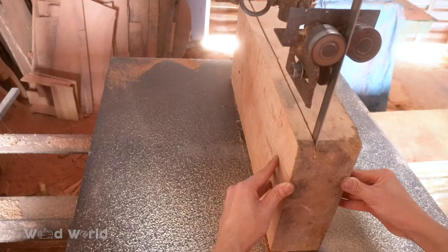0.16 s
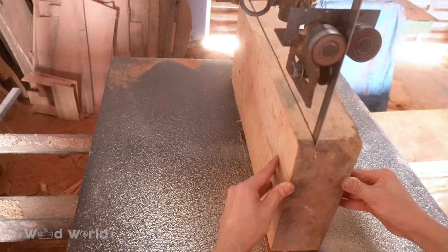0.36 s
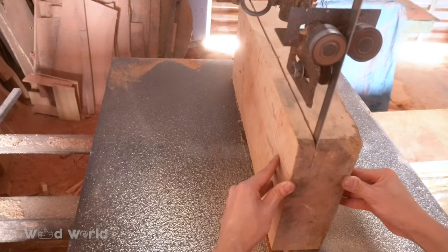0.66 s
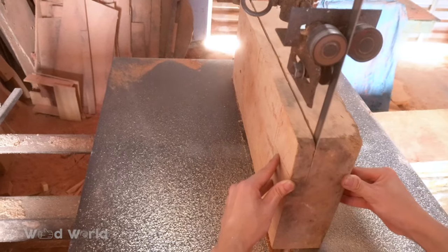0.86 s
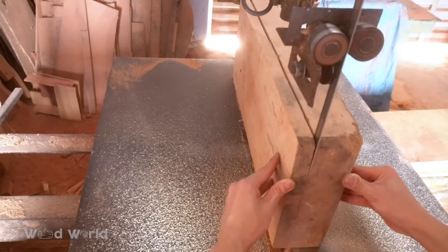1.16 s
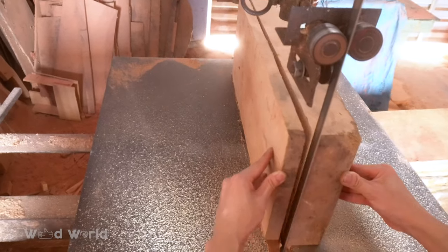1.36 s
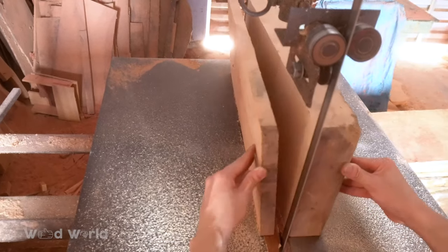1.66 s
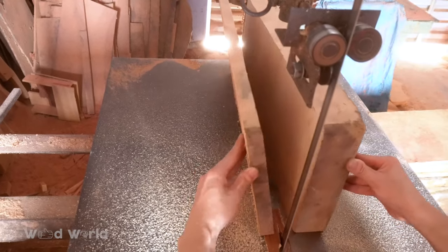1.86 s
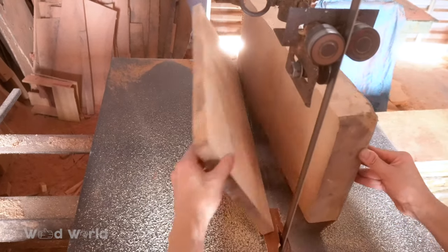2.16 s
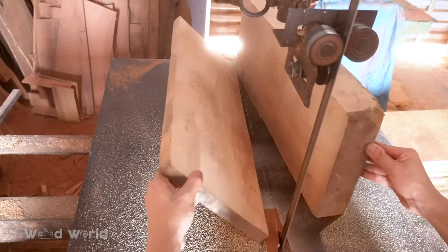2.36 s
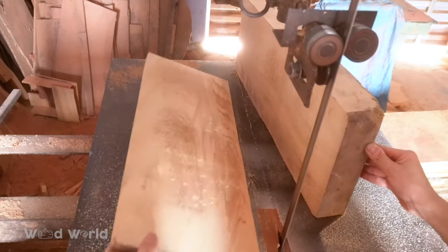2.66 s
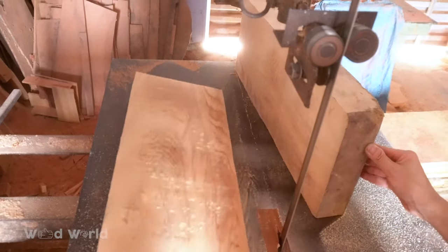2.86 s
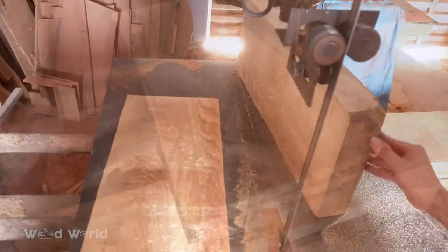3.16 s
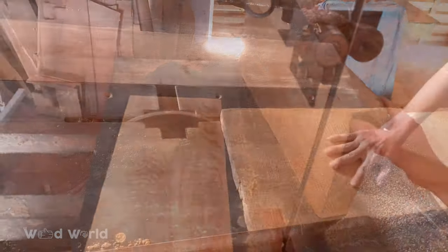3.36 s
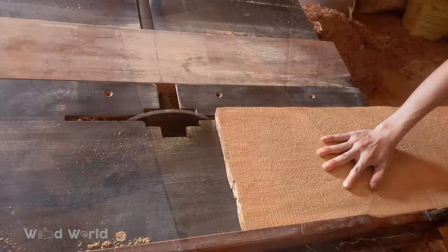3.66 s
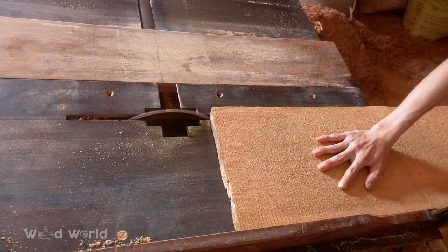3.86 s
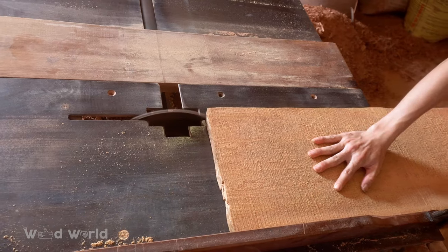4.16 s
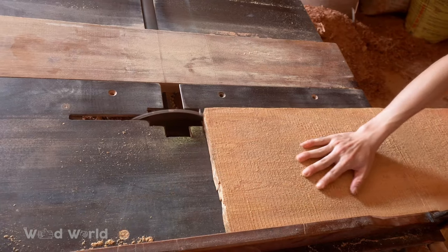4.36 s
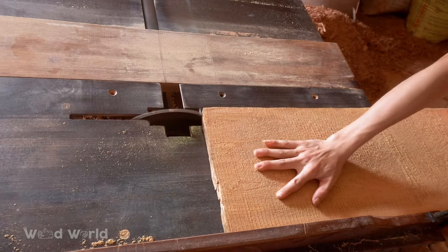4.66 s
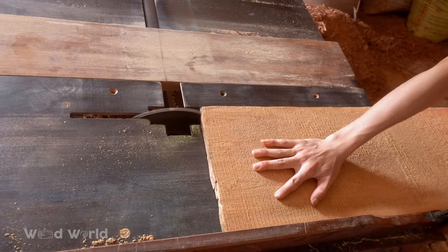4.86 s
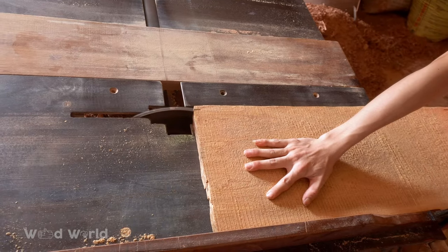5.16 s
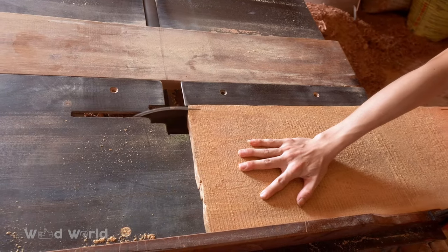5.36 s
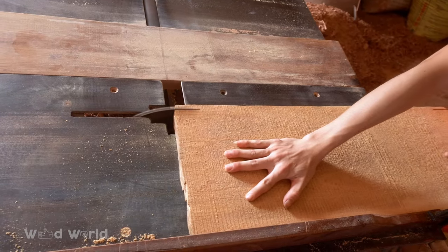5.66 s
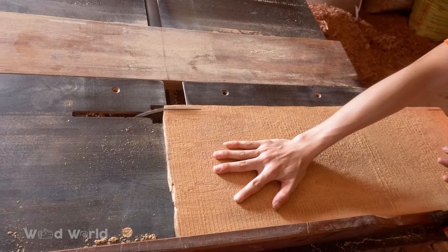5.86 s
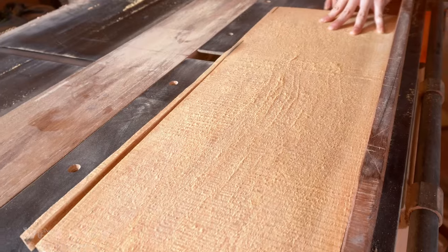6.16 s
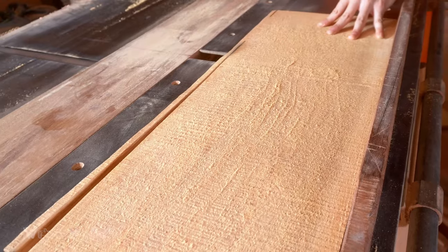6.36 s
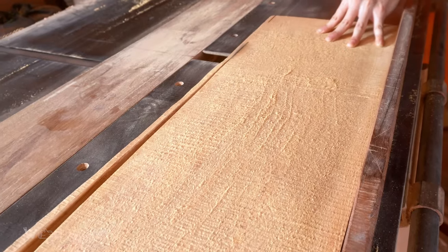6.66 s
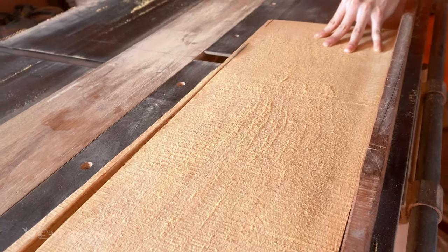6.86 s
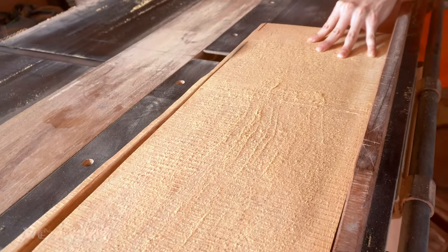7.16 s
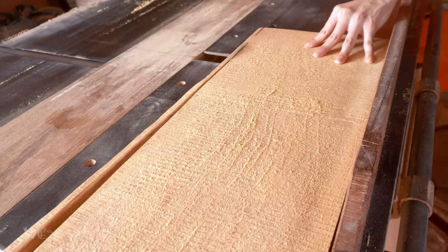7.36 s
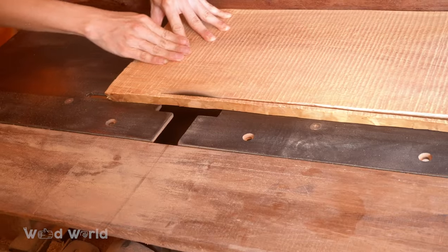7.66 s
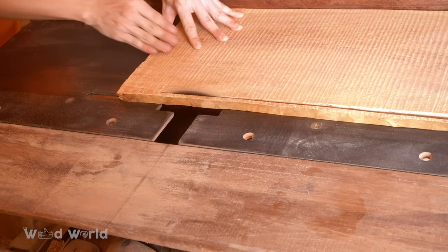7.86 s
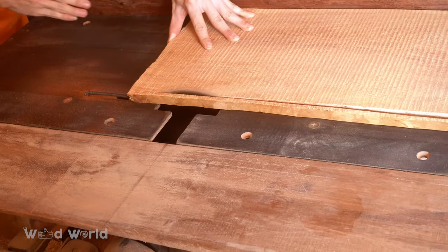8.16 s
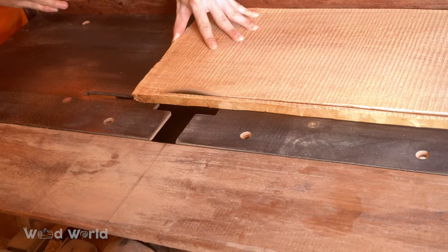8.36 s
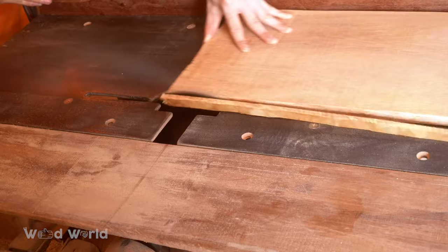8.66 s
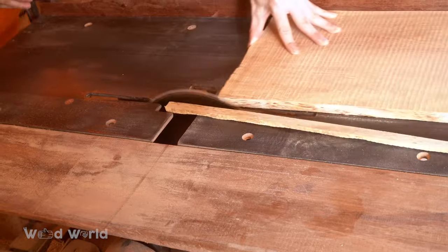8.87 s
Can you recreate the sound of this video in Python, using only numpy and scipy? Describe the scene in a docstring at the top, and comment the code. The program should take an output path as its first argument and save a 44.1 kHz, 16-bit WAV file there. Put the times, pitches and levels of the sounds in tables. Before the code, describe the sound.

A band saw is already cutting a thick wood block at 0 s, very close at first, with a dry rasp, thin whine and sawdust hiss. From 0.25 s more frame rattle is heard; small grabs pulse through the cut, the strongest near 1.37 s. By about 1.7 s the rasp opens into a lower metallic ringing and steady hiss. Around 2.9-3.2 s a plank scrapes and drops with a soft hollow knock. At 3.44 s it switches to a low, steady planer hum with rushing air. At 4.0 s a circular saw bites a board: gritty buzz, chip hiss, ringing disc, harder from 5.1 s, with whistles and squeals. At 6.13 s the view is nearer, rougher and shriller, with shrieks about 7 s. At 7.59 s it shifts again; the rip continues, flares around 8.75 s with a rising scrape, then falls away to hum by 9 s.

```python
"""A circular saw on a planer's shaft rips a board: each tooth tears out a noisy chip, and disc and board ring.
The planer's three knives hum on the same shaft; gain control ducks the hum as the saw bites.
This machine is heard from three places, one straight after the other.
Before it, a band saw rasps through the end of a thick block and runs on; the loose plank is laid on its table."""
import sys
import numpy as np
from scipy import signal
from scipy.fft import rfft, irfft, next_fast_len
from scipy.io import wavfile
from scipy.ndimage import map_coordinates

SR = 44100
rng = np.random.default_rng(int(sys.argv[2]) if len(sys.argv) > 2 else 0)


def wav_out(sig):
    """Save sig, one row per channel (or a flat mono array), as 16-bit PCM at SR to the path in sys.argv[1]."""
    wavfile.write(sys.argv[1], SR, np.round(np.clip(np.atleast_2d(sig).T, -1, 1) * 32767).astype(np.int16))


N = 396900


def undb(db):
    """Decibels to gain."""
    return 10 ** (np.asarray(db) / 20)


def curves(table, t):
    """The columns of a table, joined by straight lines and read at the times t."""
    s, *columns = np.transpose(table)
    return [np.interp(t, s, c) for c in columns]


def shaped(x, response):
    """Filter x with a response given as a function of frequency."""
    size = next_fast_len(len(x) + 4096)
    f = np.maximum(np.arange(size // 2 + 1) * SR / size, 1)
    return irfft(rfft(x, size) * response(f), size)[:len(x)]


def slope(f, points):
    """Gain along (Hz, dB) points, joined on a logarithmic pitch scale."""
    hz, db = np.transpose(points)
    return undb(np.interp(np.log(f), np.log(hz), db))


def colour(x, points):
    """Give x a spectrum; rms 1."""
    y = shaped(x, lambda f: slope(f, points))
    return y / y.std()


def ring(x, modes):
    """Resonances (Hz, width Hz, dB); white drive of rms 1 gives each its level."""
    def response(f):
        total = 0
        for k, (hz, width, db) in enumerate(modes):
            level = undb(db) * np.sqrt(SR / np.pi / width)
            # neighbours take opposite signs
            total = total + (-1) ** k * level / (1 + 1j * (f * f - hz * hz) / (f * width))
        return total
    return shaped(x, response)


def walk(t, rate, size=8):
    """Smooth chance with a spread near 1, taking a new random value `rate` times a second."""
    knots = rng.standard_normal(4096)
    steps = (t - t[0]) * rate
    grid = np.arange(int(steps[-1] * size) + 2) / size
    return np.interp(steps, grid, map_coordinates(knots, [grid], order=2, mode="wrap"))


def bump(t, s, half):
    """A smooth rise and fall around the time s."""
    return np.exp(-((t - s) / half) ** 2)


def swell(t, cycle):
    """A regular swell of a turning part."""
    rate, crest = cycle
    return np.cos(2 * np.pi * rate * (t - crest))


def strikes(phase, scatter_db, decay):
    """Each tooth or knife pass makes a burst of noise with its own strength; decay in passes; rms 1."""
    sizes = undb(scatter_db * rng.standard_normal(2 ** 15))
    strength = sizes[phase.astype(int) % len(sizes)]
    y = strength * np.exp(-(phase % 1) / decay) * rng.standard_normal(len(phase))
    return y / y.std()


# The plank scrapes and lands. Each row: time in seconds, level in dB, pitch in Hz, width in Hz,
# rise in seconds, decay in seconds.
PLANK_CONTACTS = [(2.93, -26.5, 2220, 70, 0.0044, 0.052), (2.97, -27, 1550, 600, 0.025, 0.024),
                  (3.14, -28, 970, 120, 0.091, 0.053), (3.198, -21, 1030, 264, .004, 0.027),
                  (3.225, -25, 808, 55, 0.017, 0.06)]


def plank(t):
    """The plank's edge scrapes over the iron table and it drops flat with a hollow knock."""
    out = 0
    for s, db, hz, width, rise, decay in PLANK_CONTACTS:
        contact = np.exp(np.minimum((t - s) / rise, (s - t) / decay))
        rub = shaped(rng.standard_normal(len(t)), lambda f: np.exp(-((f - hz) / width) ** 2))
        out = out + undb(db) * contact * rub / rub.std()
    return out


# How much of the band is in the wood.
# Each row: time in seconds, share of its sound that comes from teeth in the wood, 0 to 1.
BITE = [(0, 1), (1.25, .97), (1.56, .72), (1.72, .12), (2.1, 0)]
# Band saw, eased off as the cut nears its end.
# Each row: time in seconds, blade rasp in dB, sawdust hiss in dB.
FEED = [(0, -24.5, -23), (0.45, -24.5, -31.5), (0.9, -24, -33), (1.17, -23.5, -30.5), (1.28, -28, -35.5),
        (1.66, -27, -34.5), (1.75, -28, -30.5), (3.43, -30, -30.3)]
# The band grabs and shakes; the strongest grab is the teeth breaking through.
# Each row: time in seconds, half length in seconds, change of the rasp in dB, of the frame in dB.
GRABS = [(0.045, 0.02, 1, 3), (0.32, 0.068, 1.8, -2), (0.44, .05, -0.5, 1.5), (0.58, 0.031, -1, 2.5),
         (0.68, 0.051, 2.5, -5), (0.884, 0.06, 0, -2.5), (1.013, 0.034, 0.5, -7), (1.3, 0.051, 0, -5),
         (1.368, 0.027, 6, -0.5), (1.99, 0.02, 0, 2.5), (2.396, 0.017, 1.5, 5)]
# Noise colours of the band in the cut, the band running free, its frame, and the dust.
# Each row: pitch in Hz, relative level in dB.
KERF_COLOUR = [(200, -60), (900, -20), (1350, -13.5), (1900, -3.5), (2400, -4), (3000, -2.5), (3800, -3.5),
               (4600, -7), (5200, -12), (7000, -14.5)]
FREE_COLOUR = [(200, -65), (900, -30), (1400, -13), (1700, -5.5), (1900, 6), (2300, 0), (2650, 1.5),
               (3300, -3), (3900, 3), (4550, -14), (5200, -25)]
FRAME_COLOUR = [(60, -68), (120, -32), (170, -32), (230, -22), (340, -6), (430, -2), (540, 3), (800, 2),
                (1000, 4.5), (1250, -2.5), (1600, 3), (2500, -41)]
DUST_COLOUR = [(300, -65), (2500, -19), (4800, 2.5), (7500, 1.5), (9800, 1.5), (12000, -1), (15000, -0.5),
               (16000, -0.5)]
# Resonances of the band pinched in the cut, heard close by, and free between its guides; then of the frame.
# Each row: pitch in Hz, width in Hz, relative level in dB.
PINCHED_MODES = [(2690, 55, -13), (3160, 34, -5.5), (3500, 90, -19), (3780, 70, -16), (4650, 120, -20),
                 (9850, 70, -22)]
CLOSE_UP_MODES = [(3450, 40, -7), (4640, 70, -11)]
FREE_MODES = [(1560, 30, -19), (1880, 90, -11), (2210, 60, -7), (2960, 55, -9.5), (4060, 120, -12),
              (4440, 80, -12.5)]
FRAME_MODES = [(350, 7.9, -24.5), (505, 11, -17), (660, 6.8, -36), (1000, 5.8, -7.5), (1247, 59, -8)]
# the band swells once a lap and once a turn of its wheels: (swells per second, time of a crest in s)
LAP, WHEEL = (2.64, .335), (8.0, .105)
LAP_DB, WHEEL_DB = 0.3, 1  # swell depths, before the weights for blade and frame
FRAME_DB, FRAME_SWELL, FRAME_LAG_S = -35.5, 1.25, 0.06  # level, weight of the swells, lag behind the lap
# at first the blade is heard from close by, with little of the frame
CLOSE_UP_END_S, CLOSE_UP_FRAME_DB = 0.25, -10
WHINE_SWELL, WHINE_FLICKER_DB = .6, 1.5  # the pinched whine follows each surge and breaks up
DIP_S, DIP_HALF_S, DIP_DB = 3.215, 0.026, -7  # the hiss dips as the plank lands, the blade less so
DUST_TILT_DB = 2  # the hiss above about 12 kHz gains half this in the cut, 2.5 times this running free


def band_saw(t, tooth_hz=460):
    """Teeth rasp through the block; once the cut opens, the free band rings lower between its guides."""
    rasp_db, dust_db = curves(FEED, t)
    bite = np.clip(curves(BITE, t)[0], 0, 1)
    close_up = np.clip((CLOSE_UP_END_S - t) / .08 + .5, 0, 1)

    # the band swells more while it is in the wood
    wheel_db = WHEEL_DB * swell(t, WHEEL)
    surge_db = (0.49 + 0.31 * bite) * (LAP_DB * swell(t, LAP) + wheel_db)
    surge_db = surge_db + sum(db * bump(t, s, half) for s, half, db, _ in GRABS)
    frame_db = FRAME_DB + CLOSE_UP_FRAME_DB * close_up + 0.73 * walk(t, 12)
    frame_db = frame_db + FRAME_SWELL * (LAP_DB * swell(t - FRAME_LAG_S, LAP) + wheel_db)
    frame_db = frame_db + sum(db * bump(t, s, half) for s, half, _, db in GRABS)
    dip_db = DIP_DB * bump(t, DIP_S, DIP_HALF_S)
    dust_db = dust_db + 0.81 * surge_db + dip_db

    teeth = np.cumsum(tooth_hz * (1 + .03 * walk(t, 6))) / SR  # teeth passed so far
    cutting = strikes(teeth, scatter_db=0.5, decay=1.7) * undb(2.15 * walk(t, 44.97))
    running = strikes(teeth, scatter_db=1.3, decay=2.1) * undb(1.7 * walk(t, 39.96))
    rubbing = rng.standard_normal(len(t))  # the band's flanks against wood and guides
    whine_db = WHINE_SWELL * surge_db + WHINE_FLICKER_DB * walk(t, 16.7) - 7 * close_up - 2.0
    kerf = undb(-1.0) * colour(cutting, KERF_COLOUR) + ring(rubbing * undb(whine_db), PINCHED_MODES)
    kerf += close_up * ring(rubbing, CLOSE_UP_MODES)
    free = undb(-1.5) * colour(running, FREE_COLOUR) + ring(rubbing, FREE_MODES)
    blade = np.sqrt(bite) * kerf + np.sqrt(1 - bite) * free

    shaking = strikes(teeth, scatter_db=2.0, decay=1.4)
    frame = colour(shaking, FRAME_COLOUR) + ring(shaking, FRAME_MODES)

    dust = colour(strikes(teeth, scatter_db=1.05, decay=5.3), DUST_COLOUR) * undb(.5 * walk(t, 28.73))
    top = shaped(dust, lambda f: 1 / (1 + (12000 / f) ** 8))
    dust = dust + top * (undb(DUST_TILT_DB * (2.5 - 2 * bite)) - 1)

    blade = blade * undb(rasp_db + surge_db + 0.31 * dip_db)
    return blade + frame * undb(frame_db) + dust * undb(dust_db)


# The cut loads the motor a little. Each row: time in seconds, shaft turns per second.
SHAFT = [(3.44, 83.28), (4.8, 83.22), (5.5, 83.1), (6.0, 82.98), (7.6, 83.0), (8.2, 83.17), (8.62, 83.27),
         (8.75, 82.85), (9, 83.35)]
# The machine at each place. Each row: hum in dB, air rush in dB, board chatter in dB over the cutting load,
# level of the whole place in dB, set after the gain control.
STATIONS = [(-18, -21.5, -5.5, 1), (-25.5, -24, -6.5, -0.33), (-19.5, -25, -8.5, -1)]
# Tones of the hum. Each row: multiple of the knife rate, relative level in dB at each of the three places.
HUM = [(1, -17, -12.5, -28.5), (2, 0.5, -4, 2), (3, -13.5, -5.5, -22.5), (4, -18, -17, -6.5),
       (5, -34, -11, -16), (7, -22.5, -3.5, -14)]
# Air thrown by the cutter block. Each row: pitch in Hz, relative level in dB.
AIR_COLOUR = [(40, -66), (130, -32.5), (220, -27.5), (340, 1.5), (620, -1.5), (1200, -4.5), (3200, -2.5),
              (4000, 4.5), (4800, -1.5), (6600, -11.5), (8700, -13.5), (12000, -22), (16000, -28)]
KNIVES = 3


def planer(t, turns, place):
    """Three knives chop the air at the table lips: a siren-like hum and a pulsing rush."""
    hum_db, air_db, _, _ = STATIONS[place]
    hum = 0
    for k, *dbs in HUM:
        phase = round(k) * KNIVES * turns + rng.random()
        level = np.sqrt(2) * undb(dbs[place] + 0.6 * walk(t, 26.0))
        hum = hum + level * np.sin(2 * np.pi * phase)
    air = colour(strikes(KNIVES * turns, scatter_db=0.64, decay=6.3), AIR_COLOUR)
    return hum * undb(hum_db) + air * undb(air_db)


def line(t, turns, order, blur=.42, sway_db=2.5):
    """A multiple of the shaft rate; the grain of the wood shakes its phase (rad) and strength."""
    phase = 2 * np.pi * (order * turns + rng.random()) + blur * walk(t, 55)
    return np.sqrt(2) * np.sin(phase) * undb(sway_db * walk(t, 7.17) + 2.94 * walk(t, 39.97))


def each_turn(turns, size=512):
    """No two teeth are alike, so part of their noise comes back on every turn of the disc."""
    pattern = rng.standard_normal(size)
    return map_coordinates(pattern, [turns % 1 * size], order=3, mode="grid-wrap")


# The wood pinches the blade and one voice flares up. Each row: voice, start in seconds, end in seconds,
# rise in dB. A row whose end comes before its start stays silent.
PINCHES = [ ("tooth", 4.42, 4.63, 8), ("whistle", 4.43, 4.62, 9), ("chatter", 4.38, 4.45, 5),
           ("tooth", 5.15, 5.64, 8), ("tooth", 5.64, 6.06, 13), ("chatter", 5.72, 5.83, 7.5),
           ("squeal", 5.6, 5.88, 5), ("squeal", 5.88, 6.12, 10), ("whistle", 6.11, 6.25, 13),
           ("squeal", 6.17, 6.35, 4.3), ("whistle", 6.36, 6.56, 13.3), ("squeal", 7.3, 5.6, 7),
           ("whistle", 6.8, 7.08, 7), ("shriek", 6.92, 7.17, 11), ("tooth", 6.96, 7.1, 9),
           ("chatter", 7.03, 7.7, 3.3), ("whistle", 7.2, 7.33, 5.6), ("tooth", 7.68, 8.65, 6.8),
           ("whistle", 7.85, 8.05, 8.2), ("whistle", 8.22, 8.34, 7.2), ("squeal", 7.72, 8.16, 8),
           ("whistle", 9.7, 8, 7)]
PINCH_EDGE_S = 0.053  # a pinch takes this long to come and to go


def pinch(t, voice):
    """Rise in dB of one voice while the wood pinches the blade."""
    return sum(db * np.clip(np.minimum(t - start, end - t) / PINCH_EDGE_S + .5, 0, 1)
               for name, start, end, db in PINCHES if name == voice)


# How hard the board is pushed into the saw, one table for each place.
# Each row: time in seconds, cutting load in dB, chip hiss in dB over that load.
PUSH = [
    [(4.04, -26.5, 13.5), (4.1, -28, 7.5), (4.2, -21.5, 2.5), (4.5, -21, 3), (4.72, -22.5, -3),
     (4.99, -22.5, 1), (5.11, -16, 3), (5.6, -17, 2.5), (5.8, -16, 1), (6.1, -20.5, 0)],
    [(6.13, -14, -3), (6.45, -11.5, -6), (6.73, -12, -3.5), (6.88, -9, -4), (7.04, -13.5, -1),
     (7.16, -17, 0), (7.3, -11, -3.5), (7.41, -14, -2), (7.55, -13, -4.5)],
    [(7.6, -20, -0.5), (7.98, -18, 4), (8.2, -18.5, 0.5), (8.35, -18.5, -0.5), (8.64, -23.5, -1.5),
     (8.74, -13.5, 5.5), (8.83, -11.5, 4), (8.88, -14.5, -3), (8.92, -21, -14), (9.0, -41, -17)],
]
# How strongly the blade rings below HIGH_HZ. Each row: time in seconds, change in dB.
DEPTH = [(4.0, 8), (4.35, -1), (4.5, 4), (4.9, -2), (5.3, 3), (6.0, 4), (6.3, -2), (8.6, 7), (8.75, 4),
         (9, 0)]
# The teeth break out of the board's end and the strip scrapes free. Each row: time in seconds, pitch in Hz,
# scrape in dB over the cutting load, change of the rasp in dB.
BREAKOUT = [(8.55, 3560, -39, 1), (8.64, 3800, -3, -2), (8.72, 4080, -1, 7), (8.77, 4600, 5, -7),
            (8.81, 4900, -15, -2), (8.9, 5000, -31, -4)]
# Noise colours of teeth tearing the wood, and of flying chips. Each row: pitch in Hz, relative level in dB.
TEAR_COLOUR = [(100, -72), (300, -39), (700, -10), (1150, -2), (2000, -2), (2900, 0), (4000, 1),
               (5200, 3.5), (7200, -3), (7900, -11), (11000, -37)]
CHIP_COLOUR = [(1000, -64), (5000, -28), (7700, 0), (8500, 6.5), (10000, 1.5), (11500, 1), (13000, -2),
               (16000, -6)]
# Resonances of the board. Each row: pitch in Hz, width in Hz, relative level in dB.
BOARD_MODES = [(1506, 28, -5), (1583, 24, -2), (1628, 81, -6)]
# Resonances of the disc. Each row: pitch in Hz, width in Hz, relative level in dB at each of the three places.
DISC_MODES = [(1880, 40, -45, -41, -45), (2030, 35, -40, -41, -41), (2580, 50, -44, -43, -42),
              (3400, 30, -50, -43, -50), (4030, 50, -37, -38, -37), (4520, 40, -41, -40, -45),
              (4883, 20, -38, -37, -44), (5066, 20, -37, -36, -36), (5362, 22, -37, -42, -41),
              (5582, 16, -44, -35, -36), (6195, 20, -39, -37, -38), (6907, 16, -48, -40, -53),
              (7079, 12, -39, -39, -35), (7343, 25, -39, -39, -41), (8280, 90, -35, -35, -35),
              (8387, 30, -39, -36, -37), (8550, 80, -40, -44, -43), (9680, 90, -39, -41, -43),
              (9930, 60, -36, -38, -40), (11040, 60, -42, -49, -42), (14920, 130, -42, -48, -43),
              (15690, 60, -44, -51, -43)]
# Tones of the uneven teeth. Each row: multiple of the shaft rate, relative level in dB at each place.
UNEVEN = [(18, -39, -42, -46), (48, -41, -43, -42), (52, -42, -46, -54), (80, -42, -39, -48),
          (87, -44, -38, -44), (108, -39, -44, -44), (120, -38, -37, -40), (138, -47, -50, -50),
          (160, -47, -45, -54)]
# Singing tones of the disc. Each entry: voice, then its multiples of the shaft rate.
TONE_ORDERS = {"tooth": [60], "whistle": [75], "squeal": [39, 40], "shriek": [101]}
# The same voices. Each entry: voice, then steady level in dB over the cutting load, phase blur in radians.
TONES = {"tooth": (-14, 0.29), "whistle": (-16.5, 0.32), "squeal": (-16, 0.49), "shriek": (-17.5, 0.68)}
TEETH = 60
HIGH_HZ = 8000  # above this pitch the disc is rung by chips rather than by the cutting force
ENTRY_S, ENTRY_RISE_S = 4.018, 0.044  # the board meets the teeth
CHATTER_BUILD_S = 0.28  # the board's chatter builds up over this time from the entry


def circular_saw(t, turns, place):
    """Teeth tear the board, harder at some angles of each turn, and set disc and board ringing."""
    rasp_db, chips_over_db = curves(PUSH[place], t)
    chips_db = rasp_db + chips_over_db
    board_db = rasp_db + STATIONS[place][2] + pinch(t, "chatter")
    depth_db, = curves(DEPTH, t)
    scrape_hz, scrape_db, thin_db = curves(BREAKOUT, t)

    # the disc runs slightly out of true and the board shudders against it, four times a turn
    angle = 2 * np.pi * turns
    load = (1 + 0.057 * np.cos(angle) + 0.35 * np.cos(4 * angle)) * undb(1.56 * walk(t, 60))
    tearing = load * strikes(TEETH * turns, scatter_db=2.0, decay=0.7)
    buzz = each_turn(turns + 0.00098 * walk(t, 11.8))
    rasp = colour(tearing + undb(-2.5) * buzz, TEAR_COLOUR) * undb(rasp_db + thin_db - 2.0)

    flying = load * strikes(TEETH * turns, scatter_db=4.0, decay=0.57)
    chips = colour(flying + undb(-3.0) * buzz, CHIP_COLOUR)
    chips = chips * undb(chips_db - 0.5 + 1.7 * walk(t, 19))

    chatter_build = np.clip((t - ENTRY_S) / CHATTER_BUILD_S, 0, 1)
    board = ring(tearing, BOARD_MODES) * undb(board_db) * chatter_build

    # bending modes follow the cutting force, the high ones the chips
    force, fine = undb(rasp_db + 23 + depth_db), undb(chips_db + 27.5)
    modes = [(hz, width, dbs[place]) for hz, width, *dbs in DISC_MODES]
    knocks = load * strikes(TEETH * turns, scatter_db=3.5, decay=1.2)
    disc = undb(1.0) * ring(knocks * force, [m for m in modes if m[0] < HIGH_HZ])
    disc += undb(-1.5) * ring(knocks * fine, [m for m in modes if m[0] >= HIGH_HZ])

    uneven = 0
    for k, *dbs in UNEVEN:
        low = k * SHAFT[0][1] < HIGH_HZ
        drive = force * undb(2.5) if low else fine * undb(-2.2)
        uneven = uneven + drive * undb(dbs[place]) * line(t, turns, round(k))

    sing = 0
    for voice, (db, blur) in TONES.items():
        level = undb(rasp_db + db + pinch(t, voice))
        for order in TONE_ORDERS[voice]:
            sing = sing + level * line(t, turns, order, blur=blur, sway_db=3.3)

    # the last sliver of wood gets shorter, so its scrape rises
    scrape_tone = np.sin(2 * np.pi * np.cumsum(scrape_hz) / SR)
    scrape = undb(rasp_db + scrape_db) * walk(t, 1000) * scrape_tone

    entry = np.clip((t - ENTRY_S) / ENTRY_RISE_S, 0, 1)
    return entry * (rasp + chips + board + disc + uneven + sing + scrape)


CEILING_DB, ATTACK_S, RELEASE_S = -10, 0.0068, 0.08


def gain_control(x, size=88):
    """Follow the peaks, turn down quickly and come back slowly, so the hum ducks when the saw bites."""
    peaks = np.abs(x[:len(x) // size * size]).reshape(-1, size).max(axis=1)
    held, followed = peaks[:20].mean(), []
    for peak in peaks:
        reaction_s = ATTACK_S if peak > held else RELEASE_S
        held += (peak - held) * (1 - np.exp(-size / SR / reaction_s))
        followed.append(held)
    gain = np.minimum(undb(CEILING_DB) / np.array(followed), 1)
    return x * np.interp(np.arange(len(x)), np.arange(len(gain)) * size, gain)


# Where the left and right levels differ most. Each row: pitch in Hz, weight of the lean in dB.
SHADOW = [(200, -36), (500, -22.5), (1300, 0), (2400, -4), (4400, -1), (8000, 1), (15000, -40)]


def shop(x, side_points, pan_db, decay=0.02):
    """Reflections from the walls make the two sides differ, mostly in the treble."""
    lag = np.arange(8192) / SR
    echoes = rng.standard_normal(len(lag)) * np.exp(-lag / decay) * (lag > .004)
    side = signal.fftconvolve(x, echoes / np.linalg.norm(echoes))[:len(x)]
    side = shaped(side, lambda f: slope(f, side_points))
    lean_gain = np.tanh(pan_db * np.log(10) / 40)
    lean = shaped(x, lambda f: lean_gain * slope(f, SHADOW))
    return np.array([x + side + lean, x - side - lean])


# The three places. Each row: start in seconds, end in seconds.
PLACES = [(3.44, 6.13), (6.13, 7.59), (7.59, 9.0)]
# Wall reflections around the band saw, and around the planer and its saw.
# Each row: pitch in Hz, side minus middle in dB.
BAND_SIDE = [(100, -32), (380, -25), (700, -16), (1290, -7), (2380, -7), (4400, -4), (8120, -2.5),
             (15000, -4)]
RIP_SIDE = [(100, -79), (380, -33), (700, -16.5), (1290, -13), (2380, -13.5), (4400, -4.5), (15000, -5.5)]
# Lean to the left, before the weights in SHADOW: left minus right in dB for the band saw, then the three places.
PAN_DB = [3.2, 3.0, -2.4, .2]


def scene():
    """The band saw, then the planer and its saw from each place in turn, joined by very short fades."""
    time = np.arange(N) / SR
    turns = np.cumsum(curves(SHAFT, time)[0]) / SR
    fade = .006  # s
    out = np.zeros((2, N))

    now = time < PLACES[0][0]
    out[:, now] = shop(band_saw(time[now]) + plank(time[now]), BAND_SIDE, PAN_DB[0])

    for place, (start, end) in enumerate(PLACES):
        now = (time >= start) & (time < end + fade)
        t = time[now]
        machine = planer(t, turns[now], place) + circular_saw(t, turns[now], place)
        machine = gain_control(machine) * undb(STATIONS[place][3])
        edges = np.sin(np.pi / 2 * np.clip(np.minimum(t - start, end + fade - t) / fade, 0, 1))
        out[:, now] += edges * shop(machine, RIP_SIDE, PAN_DB[place + 1])
    return out


TOP_HZ = 15750


def record(dry):
    """A steep low-pass filter removes the sound above TOP_HZ."""
    return signal.sosfilt(signal.ellip(12, .1, 80, TOP_HZ, fs=SR, output="sos"), dry)


dry = scene()
out = record(dry)
wav_out(out)
```